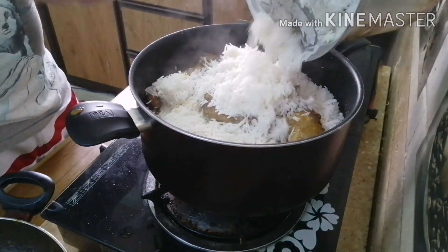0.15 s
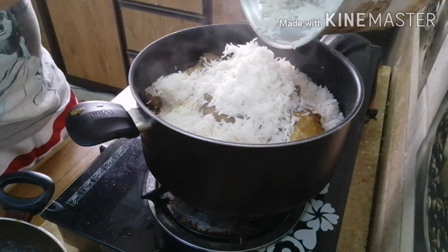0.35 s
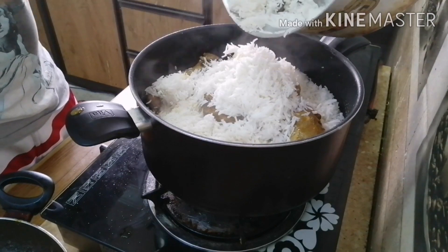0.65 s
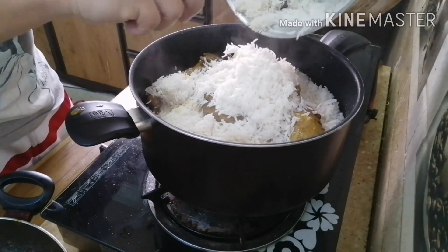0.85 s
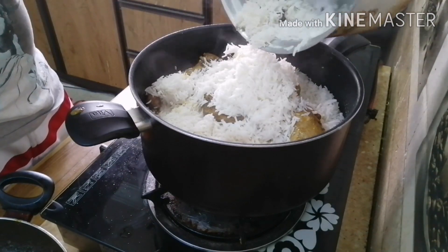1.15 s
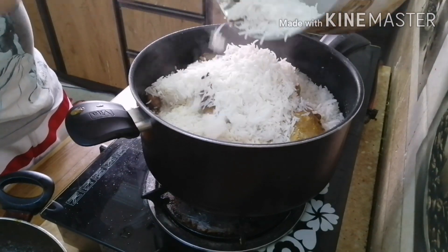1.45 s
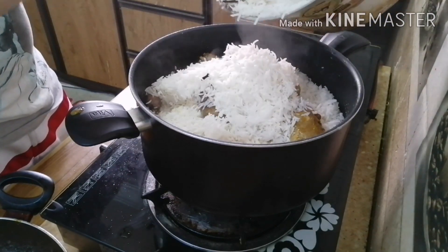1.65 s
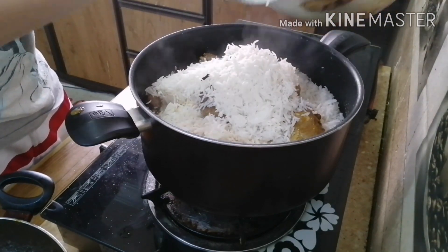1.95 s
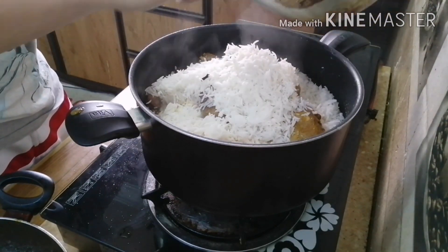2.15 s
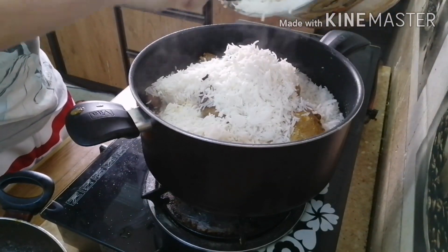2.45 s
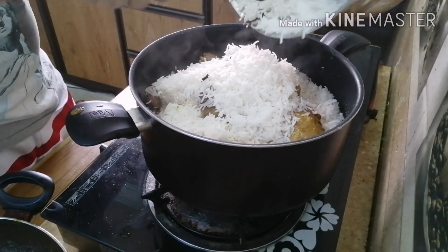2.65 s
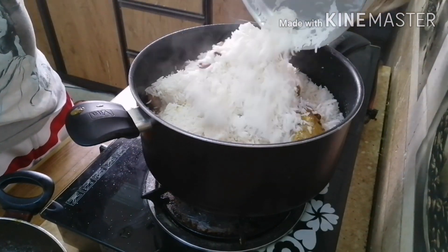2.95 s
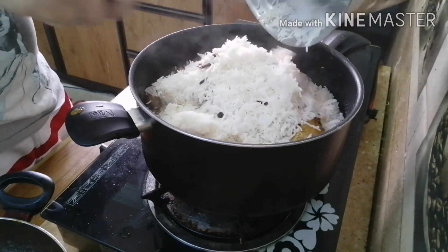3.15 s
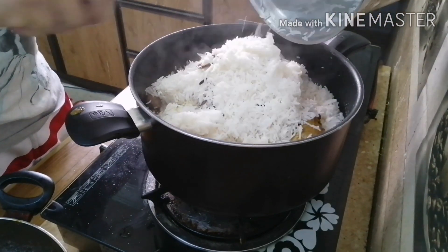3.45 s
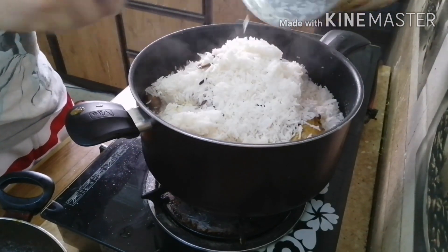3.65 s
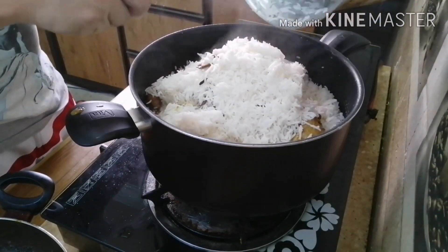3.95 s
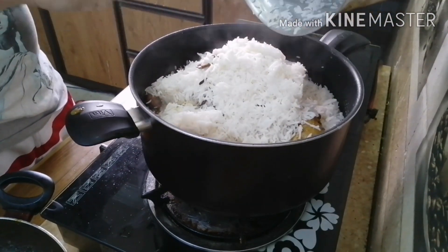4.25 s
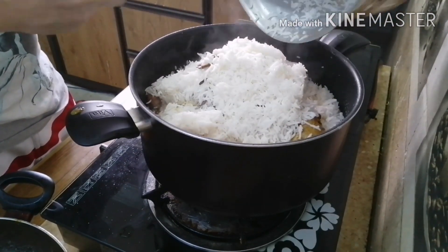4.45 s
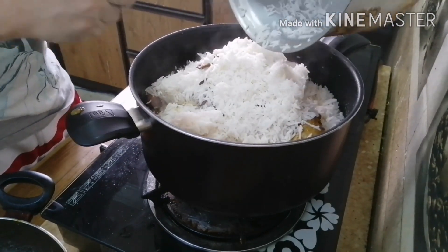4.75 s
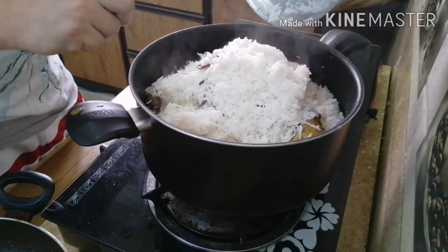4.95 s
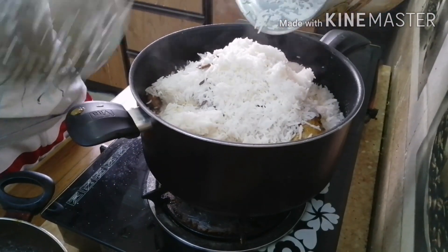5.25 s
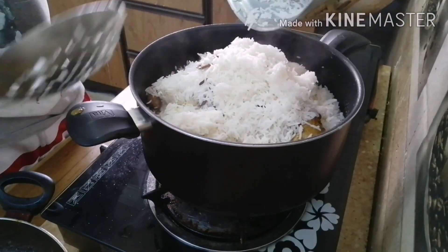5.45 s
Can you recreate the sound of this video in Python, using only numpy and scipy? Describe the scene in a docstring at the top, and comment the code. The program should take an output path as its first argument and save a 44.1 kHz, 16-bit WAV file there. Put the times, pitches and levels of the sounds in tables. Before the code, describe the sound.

Close kitchen sounds: gritty spoon scrapes and hollow thuds in a rice bowl, brief squeaks, then light clinking taps over faint stove noise.

```python
"""A faint gritty scrape over low stove noise opens it: a steel spoon scoops cooked rice from a bowl over a pot.
Close by in a small hard-walled kitchen, it digs in with dull knocks and scrapes, then taps lightly on the bowl.
Blows, chatter and stick-slip noise drive damped modes of vessel and spoon; a few strokes chirp.
Rice clumps are soft low noise swells, handling bumps are decaying sines, and the stove is coloured noise."""
import sys
import numpy as np
from scipy import signal
from scipy.fft import rfft, irfft, next_fast_len
from scipy.io import wavfile
from scipy.ndimage import uniform_filter1d, map_coordinates

SR = 44100
rng = np.random.default_rng(int(sys.argv[2]) if len(sys.argv) > 2 else 0)


def persist_wave(psi):
    """Save psi, clipped to +-1, as 16-bit WAV."""
    counts = np.round(np.clip(psi, -1, 1) * 32767).astype(np.int16)
    wavfile.write(sys.argv[1], SR, np.atleast_2d(counts).T)


N = 247224
SIZE = 12288  # samples in one contact or stroke
T = np.arange(SIZE) / SR
HZ = np.fft.rfftfreq(SIZE, 1 / SR)

# The spoon digs in; levels are relative, each layer gets a trim on top:
# (time [s], wall level [dB], steel level [dB], extra ring level [dB], contact length [s],
#  dead clack level [dB], left over right [dB])
DIG_HITS = [(.446, -43, -45.5, -1, 0.02, -11, 1), (.795, -33, -39, -5.5, 0.0057, -4, 0.5),
            (1.539, -32, -40.5, -4, .0013, -9, 0), (1.79, -35, -35.5, 3.5, 0.0056, 5, -1.5),
            (2.004, -38.5, -38, -5, 0.0025, 5.5, -2.5), (2.294, -36.5, -39.5, 0.5, 0.0046, -4, -2.5),
            (2.492, -40.5, -39.5, -6, 0.011, -9, -4), (2.513, -36.5, -39.5, 0, .004, -1, 1.5),
            (3.87, -35.5, -43, -8.5, 0.015, -2, 5.5)]


def digs():
    """Firm blows into the rice, with strong chatter against the wall."""
    return contacts(DIG_HITS, wall_db=29.5, ring_db=25.5, steel_db=28, crack_db=18.0, knock_db=18.0,
                    chatter=0.35, width_hz=49)


# Light taps on the bowl; levels are relative, each layer gets a trim on top:
# (time [s], wall level [dB], steel level [dB], extra ring level [dB], contact length [s],
#  dead clack level [dB], left over right [dB])
TAP_HITS = [(3.097, -46.5, -34.5, -2, 0.0014, -14, -3), (3.373, -59.5, -38, 4, 0.0093, 12.5, 0),
            (3.465, -59.5, -43, -0.5, 0.032, 8.5, 2.5), (3.657, -54, -36.5, -1, 0.0095, -12, -1.5),
            (4.104, -46.5, -38, -3.5, 0.01, -17, -1), (4.205, -51.5, -38, -3.5, 0.0044, -10, -3),
            (4.294, -48.5, -36.5, 3, 0.003, -5, -0.5), (4.514, -45, -37.5, -1.5, 0.0061, -22, -0.5),
            (4.8175, -50, -36, 1.5, 0.0074, 17, -3), (4.951, -44.5, -34.5, -2.5, 0.0059, -23, -0.5),
            (5.164, -49.5, -38, 0, 0.015, -18, -0.5)]


def taps():
    """Light blows that hardly chatter against the wall."""
    return contacts(TAP_HITS, wall_db=29.5, ring_db=23.5, steel_db=28.0, crack_db=12, knock_db=20.5,
                    chatter=0.052, width_hz=47)


def contacts(hits, wall_db, ring_db, steel_db, crack_db, knock_db, chatter, width_hz):
    """Each contact is a blow and a short burst of chatter as the edge skids to rest."""
    out = np.zeros((2, N))
    knock_modes = [(531, 110, 27), (890, 410, -20), (2000, 880, -40)]
    crack_modes = [(7000, 1400, 22), (15500, 1200, -39)]
    blow = signal.unit_impulse(SIZE)
    for s, low, high, extra, length, clack, pan in hits:
        skid = np.exp(-(T / length) ** 3) * (1 - np.exp(-T / 0.00006))
        skid /= np.linalg.norm(skid)

        def rattle():
            return pair(rng.standard_normal((2, SIZE)), 0.11) * skid

        boom = amp(low + wall_db) * wall(blow + chatter * rattle()[0], s, width_hz)
        ring = amp(ring_db + extra) * ringing(0.42 * blow + rattle(), s, low, high, spread_db=2.0)
        steel = amp(high + steel_db) * spoon(rattle(), spread_db=1.5, detune=0.0057, low_hz=3660)
        # knock and crack come from the contact point itself and skip the room tail
        knock = amp(low + clack + knock_db) * resonate(blow, knock_modes, low_hz=114)
        crack = amp(high + clack + crack_db) * resonate(rattle(), crack_modes, low_hz=400)
        sides = amp([[pan / 2], [-pan / 2]])
        add(out, s, kitchen(microphones(boom + (ring + steel) * sides)))
        add(out, s, microphones((knock + crack) * sides))
    return out


# Scraping strokes; levels are relative, each layer gets a trim on top:
# (peak time [s], swell [s], wall level [dB], steel level [dB])
SCRAPE_STROKES = [(.085, 0.02, -68, -54.5), (.25, 0.02, -52.5, -50), (.487, 0.018, -44, -39.5),
                  (.522, 0.022, -48, -33.5), (.86, 0.034, -41.5, -46), (0.944, 0.042, -40, -42.5),
                  (1.02, 0.034, -48, -56), (1.175, 0.046, -50, -55.5), (1.568, 0.012, -33, -43),
                  (1.618, 0.033, -46, -37), (1.828, 0.0084, -34, -71), (2.085, .025, -37.5, -53.5),
                  (2.135, 0.045, -38, -44), (2.332, 0.021, -33, -48.5), (2.38, .028, -31.5, -44),
                  (2.575, 0.025, -32.5, -44.5), (2.642, 0.041, -26, -38.5), (2.715, 0.033, -39.5, -36),
                  (2.76, 0.021, -53, -38), (2.884, .012, -40.5, -40), (2.946, 0.037, -70, -37.5),
                  (3.197, 0.028, -63, -45), (3.259, 0.0077, -91, -37), (3.526, .014, -71, -38.5),
                  (3.714, 0.025, -55.5, -46.5), (3.905, 0.018, -33, -43), (4.015, 0.042, -48, -80),
                  (4.34, 0.056, -57.5, -48)]
RELEASE = 0.58  # a stroke lets go in this share of its swell time


def scrapes(wall_db, ring_db, steel_db):
    """The edge drags: pressure swells in surges and lets go, and stick-slip sounds wall and spoon."""
    out = np.zeros((2, N))
    lead = .16  # s from the start of a stroke to its peak
    for s, swell, low, high in SCRAPE_STROKES:
        spread = swell * np.where(T < lead, 1, RELEASE)
        pressure = np.exp(-.5 * ((T - lead) / spread) ** 2)
        rubbing = pair(slips(rate=1000, spread_db=3.5, hiss=0.85), 0.22)
        force = pressure * catching(rate=150, depth_db=1.46) * rubbing
        boom = amp(low + wall_db) * wall(force[0], s, width_hz=39.3)
        grit = force * catching(rate=62, depth_db=2.44)

        def upper():
            rough = grit * catching(rate=140, depth_db=3.0)
            ring = amp(ring_db) * ringing(rough, s, low, high, spread_db=6.5)
            steel = amp(high + steel_db) * spoon(grit, spread_db=2.0, detune=0.018, low_hz=3700)
            return ring + steel

        # the edge slides from one place to the next: crossfade two sets of modes
        travel = np.pi / 2 * np.clip(.5 + (T - lead) / swell, 0, 1)
        sound = boom + np.cos(travel) * upper() + np.sin(travel) * upper()
        add(out, s - lead, kitchen(microphones(sound) * np.linalg.norm(pressure)))
    return out


def slips(rate, spread_db, hiss):
    """Stick and slip: tiny releases of uneven size, rate a second, over a smooth rubbing noise."""
    sizes = (rng.random(SIZE) < rate / SR) * amp(spread_db * rng.standard_normal(SIZE))
    return unit(sizes * rng.standard_normal((2, SIZE))) + hiss * rng.standard_normal((2, SIZE))


def catching(rate, depth_db):
    """The edge catches and runs free: a random gain of rms 1 with rate knots a second."""
    return unit(amp(depth_db * wobble(T, rate)))


# The edge squeaks on the glaze; level is before the roughness and the room:
# (peak time [s], half length [s], level [dB], pitch at the peak [Hz], glide [Hz/s])
SQUEAK_CHIRPS = [(1.571, 0.0051, -36.5, 6800, -8000), (1.593, 0.0021, -28.5, 7150, -15000),
                 (1.645, 0.0036, -33.5, 7020, 2), (2.908, 0.016, -38.5, 6560, 45013),
                 (2.942, 0.011, -34, 7290, 14000)]


def squeaks(jitter_hz):
    """For a moment the slips lock to the spoon's bright mode and give a rough, gliding chirp."""
    out = np.zeros((2, N))
    lead = .06  # s from the start of a chirp to its peak
    for s, half, db, hz, glide in SQUEAK_CHIRPS:
        jitter = jitter_hz * unit(uniform_filter1d(rng.standard_normal(SIZE), size=30))
        pitch = hz + glide * (T - lead) + jitter
        swell = amp(db) * np.exp(-.5 * ((T - lead) / half) ** 2)
        chirp = swell * np.sin(2 * np.pi * np.cumsum(pitch) / SR)
        rough = np.array([chirp * catching(rate=300, depth_db=5.5) for port in range(2)])
        add(out, s - lead, kitchen(rough))
    return out


# Where the spoon presses; flexing of the whole vessel is against the lowest wall mode, before a 2 dB lift:
# (time [s], lowest wall mode [Hz], flexing level [dB])
PRESS_PLACES = [(.45, 420, -19), (.8, 439, -26), (.95, 411, -15.5), (1.57, 451, -34), (1.8, 371, -10),
                (2.5, 366, -8.5), (2.66, 459, -8), (2.9, 373, -38), (3.9, 398, -31), (4.15, 351, -40),
                (5.2, 378, -29)]


def wall(force, s, width_hz):
    """The vessel's hollow boom; its pitch moves with the load and the place where the spoon presses."""
    times, pitches, flexes = np.transpose(PRESS_PLACES)
    flexing = (243, 55, np.interp(s, times, flexes) + 2)
    lowest = (np.interp(s, times, pitches), width_hz, 0)
    boom = resonate(force, [flexing, lowest, (670, 160, -20)], low_hz=161)
    echo = 0.34 * np.roll(boom, int(.038 * SR))  # the far wall of the kitchen returns the low note
    return (boom + echo) * amp([[-3.4], [1.8]])


# Upper vessel modes with the spoon deep in the rice, nominal: (frequency [Hz], width [Hz], level [dB])
RICE_MODES = [(958, 65, 6.5), (1240, 460, -11.5), (1576, 110, -4.5), (2168, 222, -8), (2956, 144, -5.5),
              (3560, 200, -13)]
# Modes of the tapped bowl, nominal; the narrow ones ring on: (frequency [Hz], width [Hz], level [dB])
BARE_MODES = [(955, 54, -3.5), (1967, 97, 3.5), (1977, 37, 5), (2200, 190, -22), (3341, 228, 4.5),
              (3329, 126, 7.5)]
# Spells with the spoon buried, otherwise on the bare bowl: (from [s], to [s])
BURIED = [(0, 2.8), (3.8, 4.06)]
RING_FROM_WALL = 0.26  # the upper modes lie between wall and steel, and so does their level
RUB_DB = -8  # broad rasp of rice caught under the edge, against the upper modes


def ringing(force, s, low_db, high_db, spread_db):
    """The vessel's upper modes: one set with the spoon deep in the rice, another on the bare bowl."""
    level = amp(RING_FROM_WALL * low_db + (1 - RING_FROM_WALL) * high_db)
    if any(start <= s < end for start, end in BURIED):
        rub = resonate(force * rng.standard_normal(SIZE), [(1320, 1800, 0)], low_hz=650)
        ring = resonate(force, touched(RICE_MODES, spread_db, detune=0.0034), low_hz=700)
        return level * amp(-.5) * (ring + amp(RUB_DB) * rub)
    return level * amp(-2.0) * resonate(force, touched(BARE_MODES, spread_db, detune=0.0015), low_hz=925)


# The spoon's bright, damped ring, nominal: (frequency [Hz], width [Hz], level [dB])
SPOON_MODES = [(5075, 880, -9), (6290, 525, -10), (7060, 458, -0.5), (8100, 4100, -12),
               (10730, 13500, -22.5), (15800, 830, -20)]


def spoon(force, spread_db, detune, low_hz):
    """The steel of the spoon rings in broad, quickly damped high modes."""
    return resonate(force, touched(SPOON_MODES, spread_db, detune), low_hz)


def touched(modes, spread_db, detune):
    """Each place of contact favours other modes and pulls them a little."""
    return [(hz * (1 + detune * rng.standard_normal()), width, db + spread_db * rng.standard_normal())
            for hz, width, db in modes]


RIM_S, RIM_DB, RIM_HZ, RIM_WIDTH_HZ = 4.295, -15, 1025, 35  # level is the tone's energy before the room


def rim(brush_s):
    """The spoon brushes on after one tap and keeps one narrow vessel mode sounding."""
    out = np.zeros((2, N))
    force = np.exp(-T / brush_s) * pair(rng.standard_normal((2, SIZE)), 0.63)
    tone = amp(RIM_DB) * resonate(force, [(RIM_HZ, RIM_WIDTH_HZ, 0)], low_hz=875)
    add(out, RIM_S, kitchen(tone))
    return out


# Clumps of rice slide off and land on the heap: (peak time [s], half length [s], level [dB])
RICE_FALLS = [(0.284, 0.17, -56.5), (1.314, 0.072, -55), (2.854, 0.074, -51), (3.068, 0.049, -50)]
# Dull spectrum of the landing rice, relative: (frequency [Hz], level [dB])
RICE_COLOUR = [(25, -11), (70, 0), (140, 1), (250, -6.5), (550, -5.5), (800, -14.5), (2000, -32),
               (8000, -50)]


def rice():
    """Dull, ringless thuds of many soft grains: swells of low-coloured noise."""
    t = np.arange(N) / SR
    flow = sum(amp(db) * np.exp(-.5 * ((t - s) / half) ** 2) for s, half, db in RICE_FALLS)
    return flow * coloured_noise(RICE_COLOUR, alike=0.84)


# Soft low bumps of the handling; level is before attack and side gains:
# (time [s], level [dB], pitch [Hz], T60 [s])
HANDLING_BUMPS = [(0.746, -47.5, 77, 0.1), (1.759, -33.5, 104, 0.077), (4.293, -52, 61, .05),
                  (4.695, -46, 140, 0.2), (4.819, -37, 75, 0.023)]
BUMP_ATTACK = 0.03  # rise of a bump, as a share of its decay time


def handling():
    """Soft low bumps: each is one mode that is pushed once and dies away."""
    out = np.zeros((2, N))
    for s, db, hz, t60 in HANDLING_BUMPS:
        envelope = amp(db - 60 * T / t60) * (1 - np.exp(-T / (BUMP_ATTACK * t60)))
        add(out, s, envelope * np.sin(2 * np.pi * hz * T) * amp([[1], [3.5]]))
    return out


# Spectrum of the stove's low rumble, relative: (frequency [Hz], level [dB])
STOVE_RUMBLE = [(15, -15), (30, -7.5), (70, -1.5), (130, 2.5), (220, -3), (330, -6), (600, -63)]
# Spectrum of the stove's faint rush, relative: (frequency [Hz], level [dB])
STOVE_RUSH = [(100, -12), (250, -2.5), (550, 1.5), (700, -1.5), (950, -10.5), (1500, -18.5), (3000, -19),
              (4300, -28.5), (7000, -24), (9000, -35), (15000, -47)]
RUMBLE_DB, RUMBLE_FALL_DB_PER_S, RUMBLE_WAVER_DB = -53, 2.5, 1.5
RUSH_DB, RUSH_SETTLED_DB, RUSH_SETTLE_S = -51.5, -64, 2.9


def stove():
    """A wavering low rumble, alike on both sides, under a faint diffuse rush; both die down slowly."""
    t = np.arange(N) / SR
    rumble_db = RUMBLE_DB - RUMBLE_FALL_DB_PER_S * t + RUMBLE_WAVER_DB * wobble(t, rate=2)
    rush_db = RUSH_SETTLED_DB + (RUSH_DB - RUSH_SETTLED_DB) * np.exp(-t / RUSH_SETTLE_S)
    rumble = amp(rumble_db) * coloured_noise(STOVE_RUMBLE, alike=0.99) * amp([[-1.2], [1.2]])
    return rumble + amp(rush_db) * coloured_noise(STOVE_RUSH, alike=0.22)


# Decay of the kitchen: (frequency [Hz], T60 [s])
KITCHEN_T60 = [(150, 0.048), (400, 0.39), (2000, 0.4), (7000, 0.38), (14000, 0.21)]
# Tail against the direct sound, before its soft onset: (frequency [Hz], level [dB])
KITCHEN_LEVEL = [(100, -5.5), (400, -2), (1000, -3.5), (3000, 1), (7000, -3.5), (14000, -0.5)]


def kitchen(sound):
    """The direct sound and a dense tail of decaying noise, drawn anew for each place of the spoon."""
    hz = np.fft.rfftfreq(256, 1 / SR)
    _, t, bands = signal.stft(rng.standard_normal((2, 16384)), SR, nperseg=256)
    t60 = along(KITCHEN_T60, hz)[:, None]
    even_energy = np.sqrt(np.log(10 ** 6) / (t60 * SR))  # long and short decays carry the same energy
    fade = amp(along(KITCHEN_LEVEL, hz)[:, None] - 60 * t / t60) * even_energy
    tail = signal.istft(bands * fade, SR, nperseg=256)[1]
    tail *= 1 - np.exp(-(np.arange(tail.shape[1]) / SR / 0.0036) ** 2)  # swells in over a few ms
    tail[:, 0] += 1  # direct sound
    return signal.fftconvolve(sound, tail, axes=1)


def microphones(sound):
    """The bowl is held a little to the right, so its sound reaches the left port a few samples later."""
    lag = 8  # samples
    return np.array([np.roll(sound[0], lag), sound[1]])


def resonate(force, modes, low_hz):
    """A force through damped modes that radiate little below low_hz; mean energy 1 per channel."""
    body = 0
    for k, (hz, width, db) in enumerate(modes):
        mode = 1j * HZ * width / (hz * hz - HZ ** 2 + 1j * HZ * width)
        body = body + (-1) ** k * amp(db) * mode  # neighbours in opposite phase
    s = 1j * HZ / low_hz
    radiation = s * s / (1 + np.sqrt(2) * s + s * s)
    sound = irfft(rfft(force) * body * radiation)
    return sound / np.sqrt(np.mean(np.sum(sound ** 2, axis=-1)) + 1e-20)


def coloured_noise(colour, alike):
    """Steady stereo noise of rms 1 with the given spectrum and left-right likeness."""
    noise = pair(rng.standard_normal((2, N)), alike)
    return unit(filtered(noise, lambda hz: amp(along(colour, hz))))


def wobble(t, rate):
    """A smooth random curve over the times t, rate knots a second."""
    return map_coordinates(rng.standard_normal(int(t[-1] * rate) + 4), [t * rate])


def pair(x, alike):
    """Two unrelated signals become left and right with the given likeness."""
    turn = np.arccos(np.clip(alike, -1, 1)) / 2
    return np.cos(turn) * x[0] + np.sin(turn) * np.array([x[1], -x[1]])


def amp(db):
    """Decibels to gain."""
    return 10 ** (np.asarray(db) / 20)


def unit(x):
    """Scale to rms 1."""
    return x / np.sqrt(np.mean(x ** 2) + 1e-20)


def along(points, hz):
    """Interpolate (Hz, value) points on a log frequency axis."""
    f, v = np.transpose(points)
    return np.interp(np.log(hz + 1), np.log(f + 1), v)


def filtered(x, response):
    """x times a response of frequency."""
    m = next_fast_len(N + 8192)
    return irfft(rfft(x, m) * response(np.fft.rfftfreq(m, 1 / SR)), m)[..., :N]


def add(track, s, sound):
    """Mix a stereo sound in at time s."""
    start = int(round(s * SR))
    part = sound[:, max(-start, 0):N - start]
    track[:, max(start, 0):][:, :part.shape[1]] += part


def scene():
    """Digging, tapping and scraping, with falling rice, over the stove."""
    rubbing = scrapes(wall_db=-2.0, ring_db=-5.5, steel_db=-2.4) + squeaks(jitter_hz=173)
    return digs() + taps() + rubbing + rim(brush_s=0.027) + rice() + handling() + stove()


TOP_HZ = 15600  # band limit


def record(dry):
    """A very steep low-pass leaves almost nothing above the band limit."""
    return filtered(dry, lambda hz: 1 / np.sqrt(1 + (hz / TOP_HZ) ** 120))


dry = scene()
out = record(dry)
persist_wave(out)
```